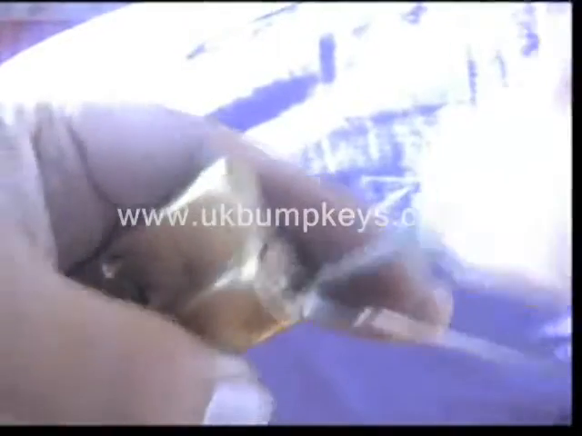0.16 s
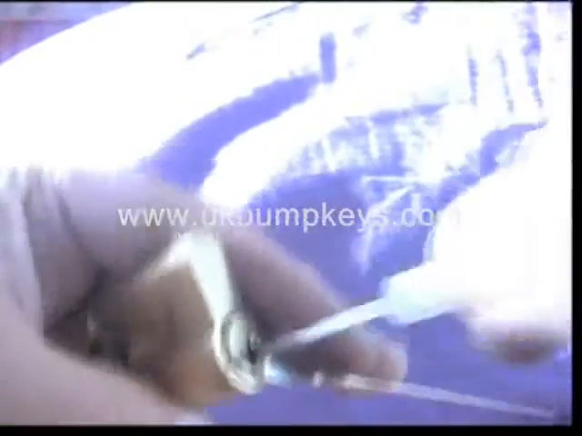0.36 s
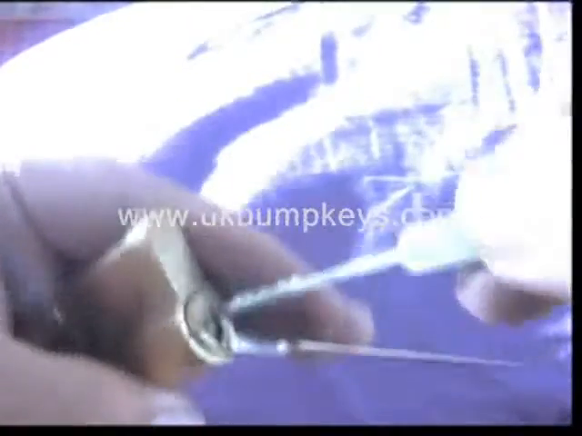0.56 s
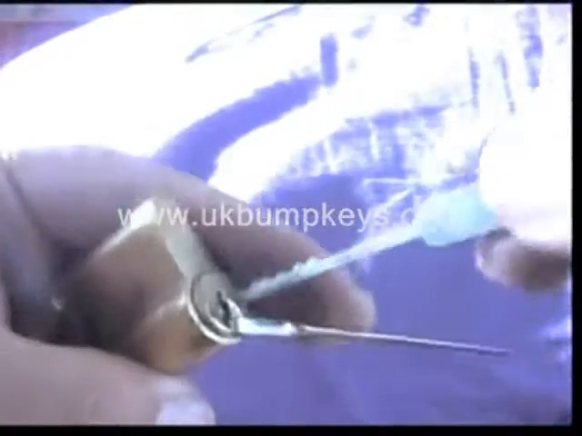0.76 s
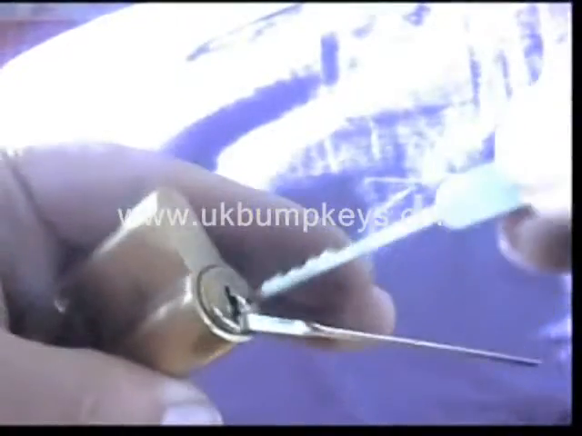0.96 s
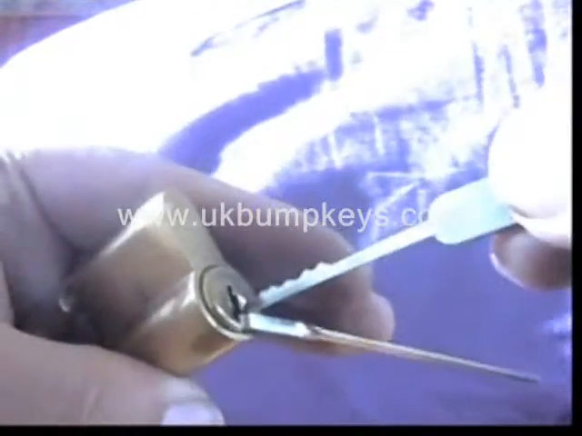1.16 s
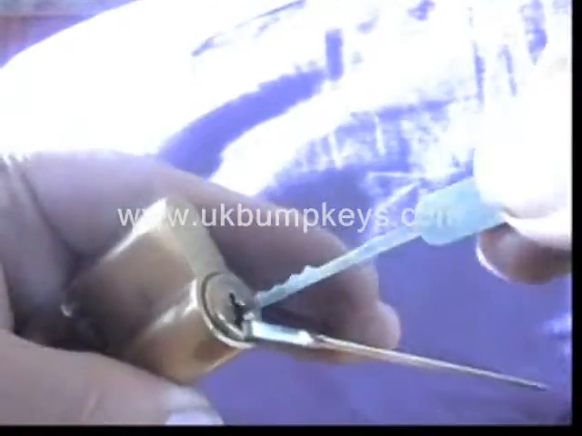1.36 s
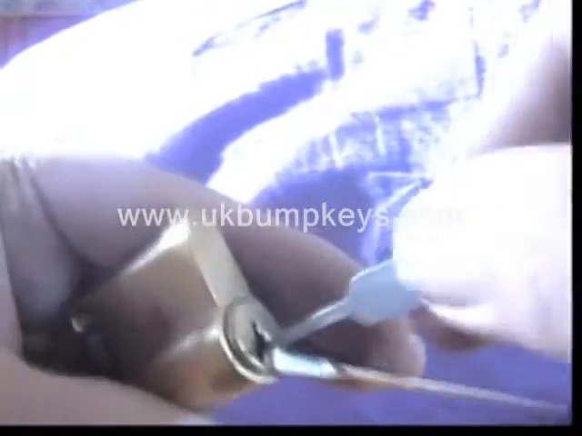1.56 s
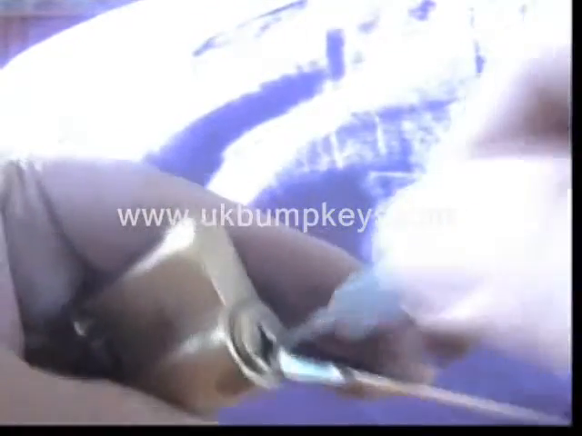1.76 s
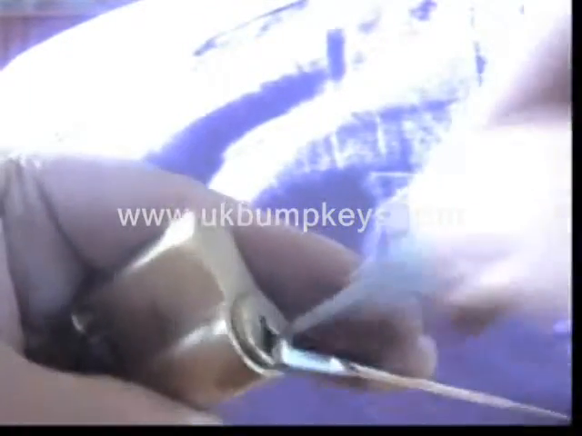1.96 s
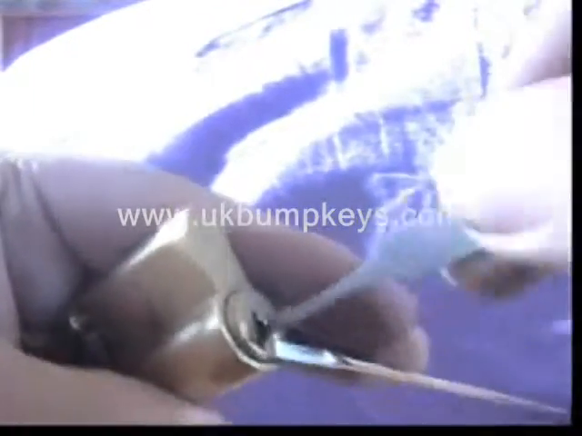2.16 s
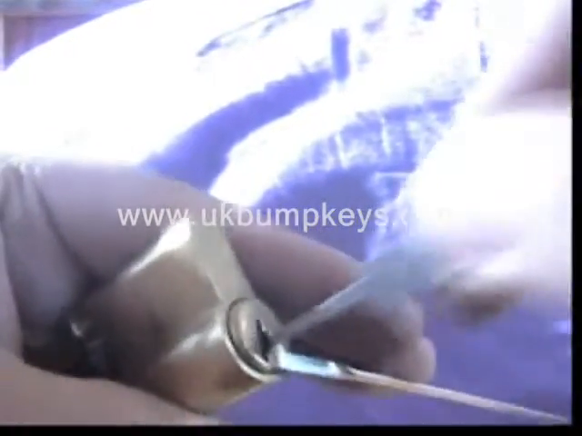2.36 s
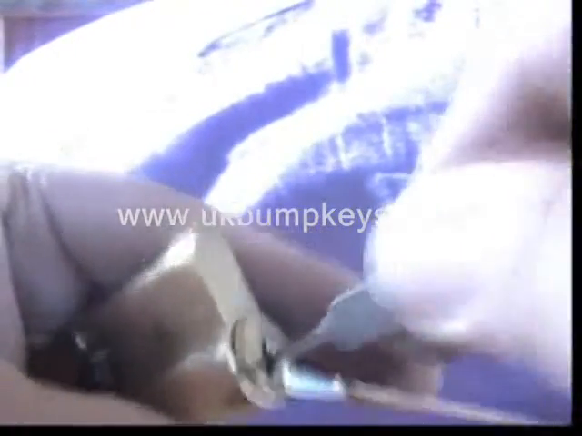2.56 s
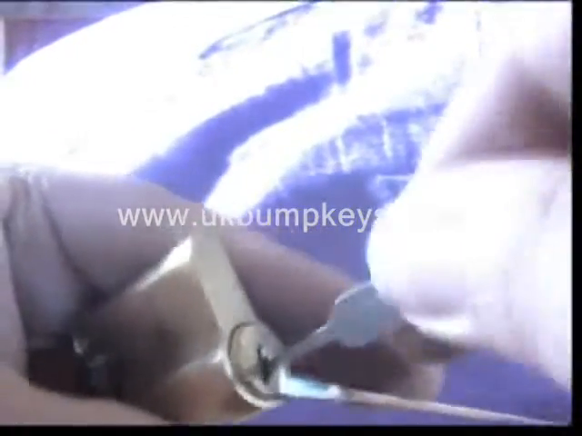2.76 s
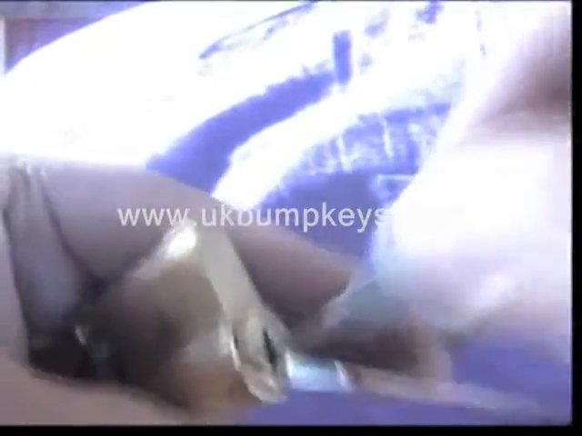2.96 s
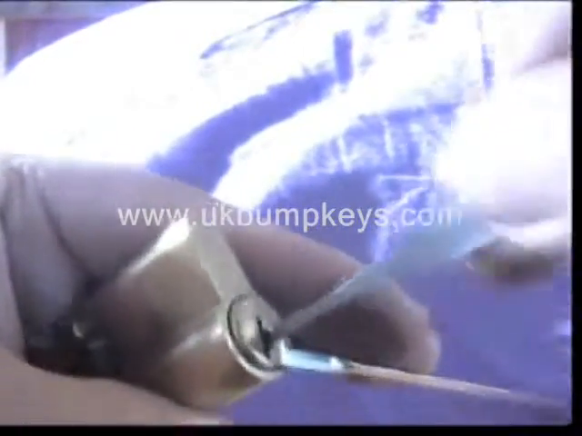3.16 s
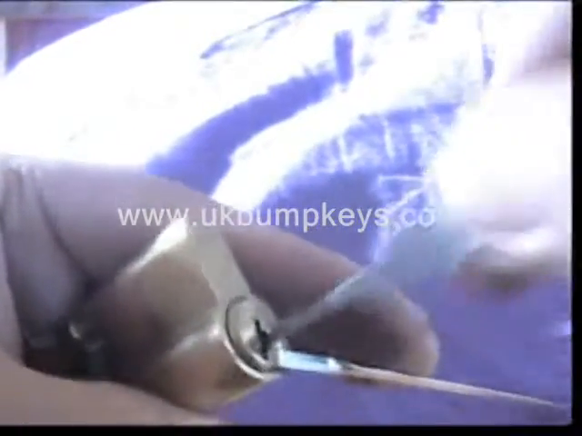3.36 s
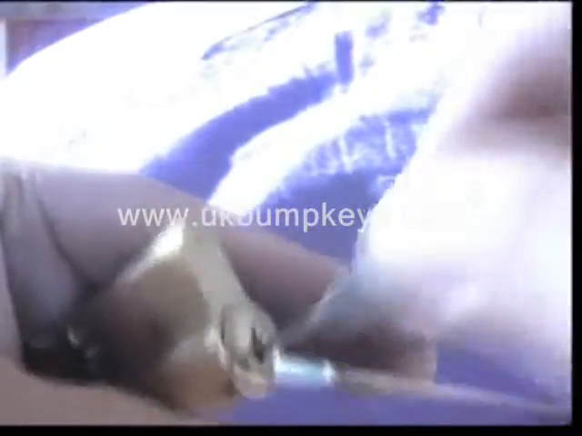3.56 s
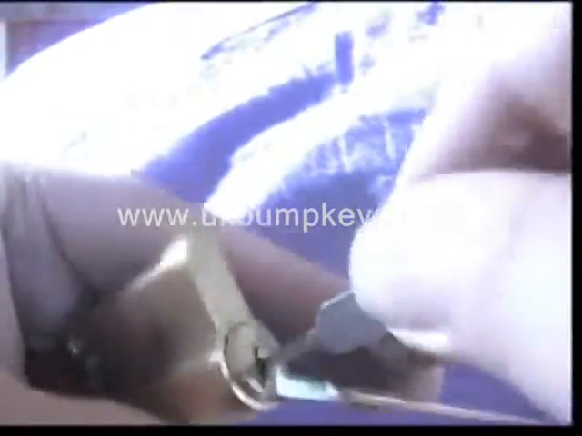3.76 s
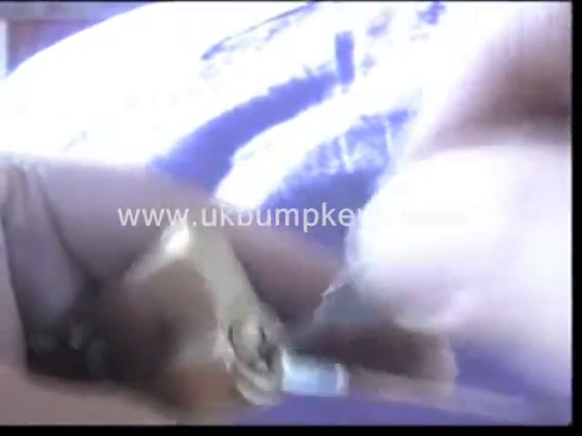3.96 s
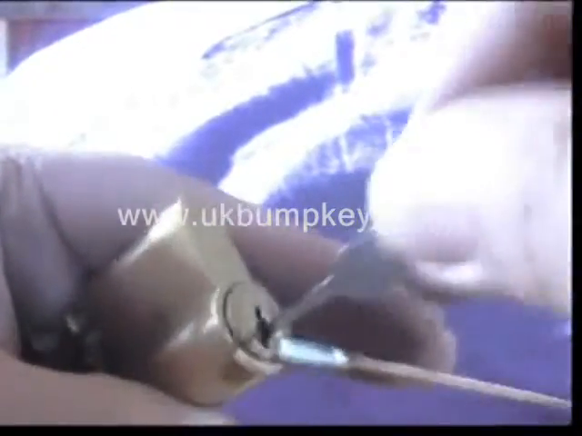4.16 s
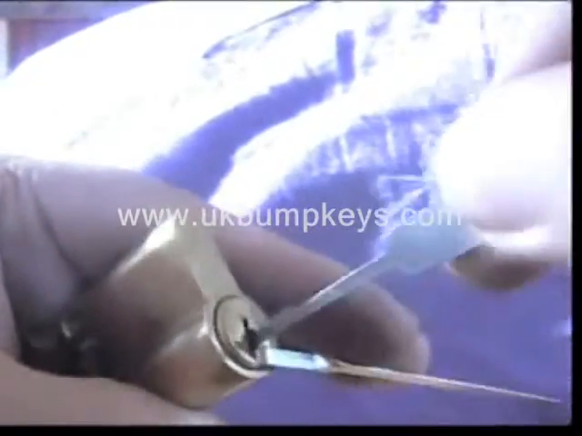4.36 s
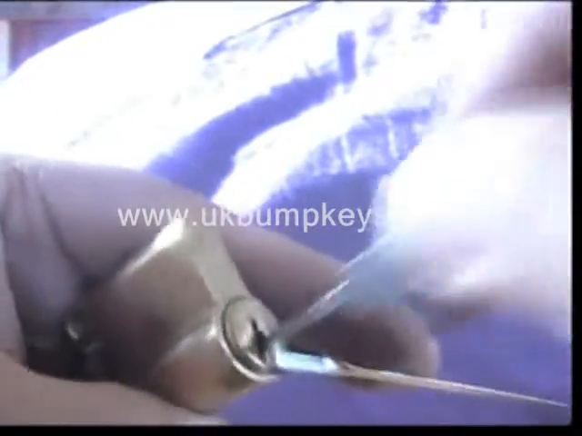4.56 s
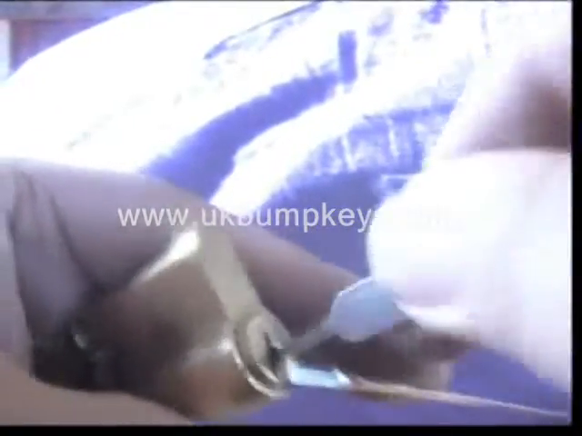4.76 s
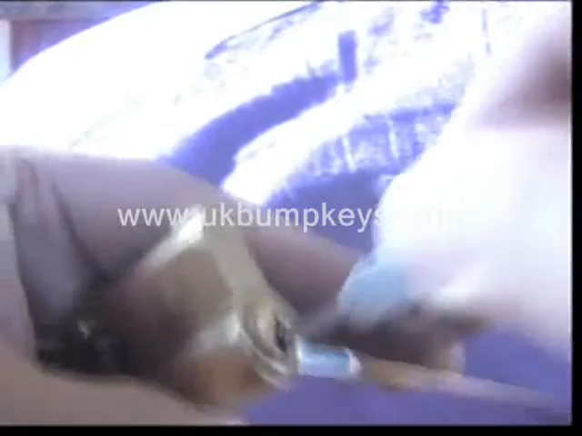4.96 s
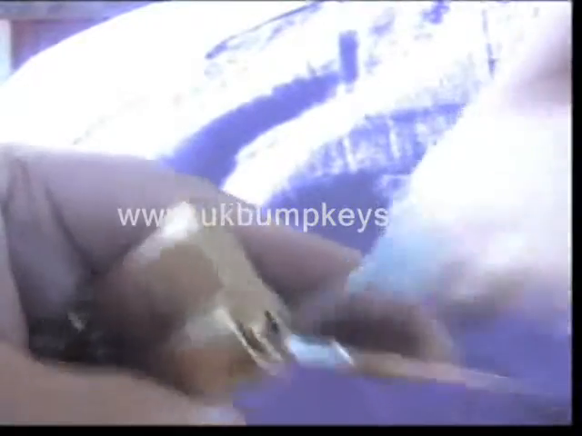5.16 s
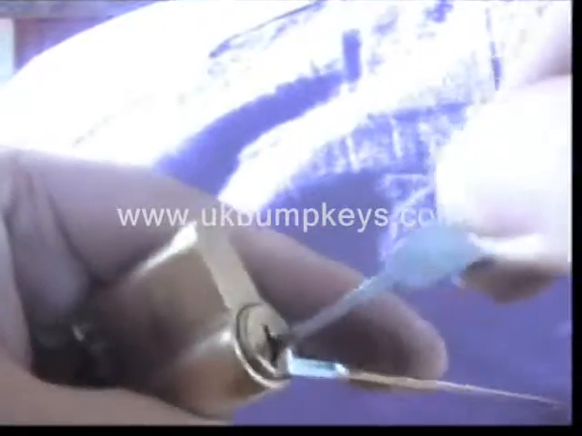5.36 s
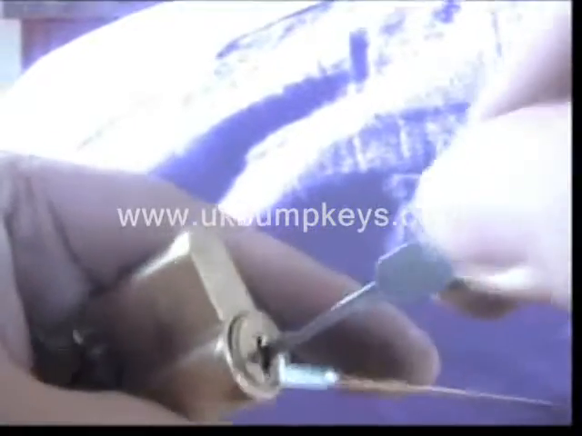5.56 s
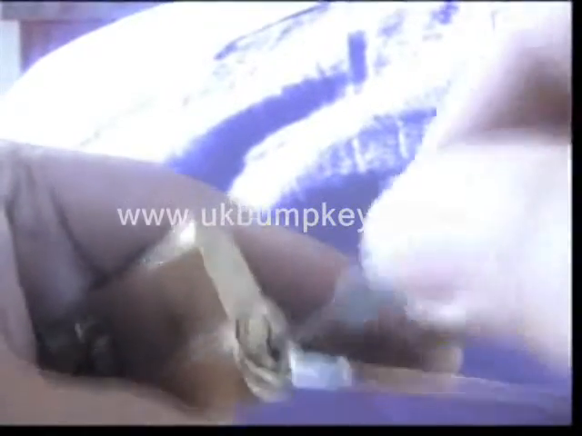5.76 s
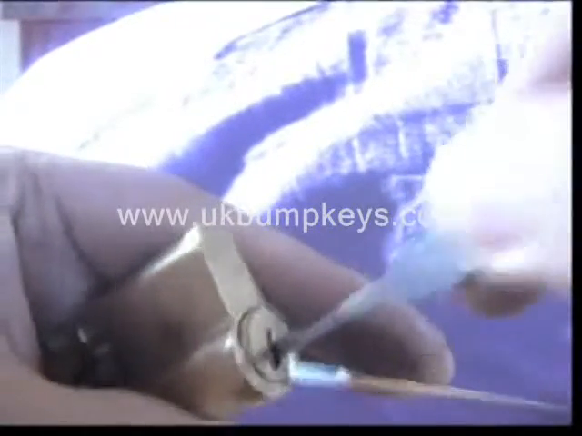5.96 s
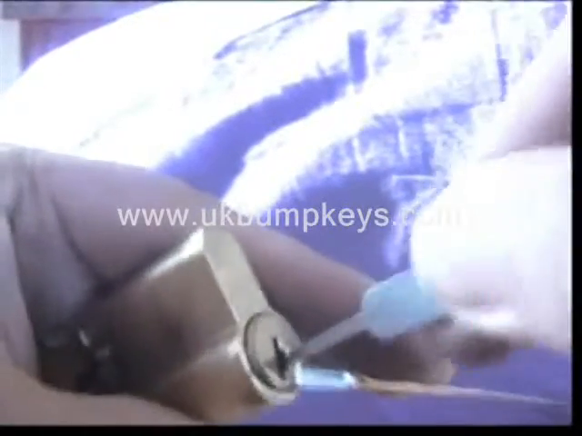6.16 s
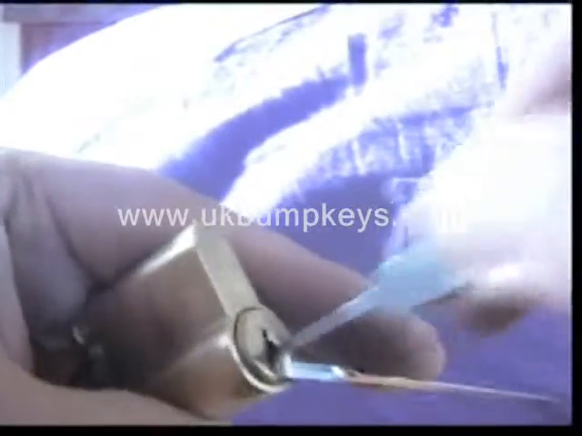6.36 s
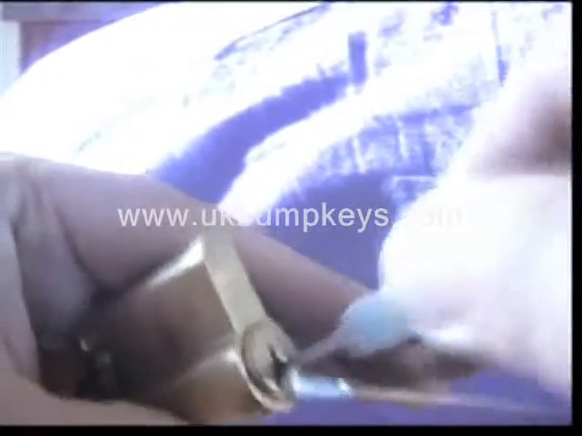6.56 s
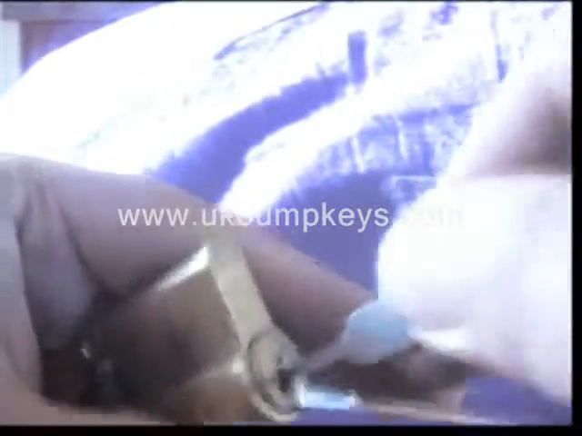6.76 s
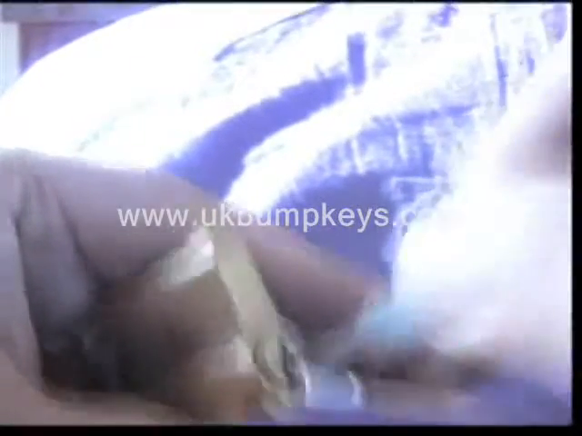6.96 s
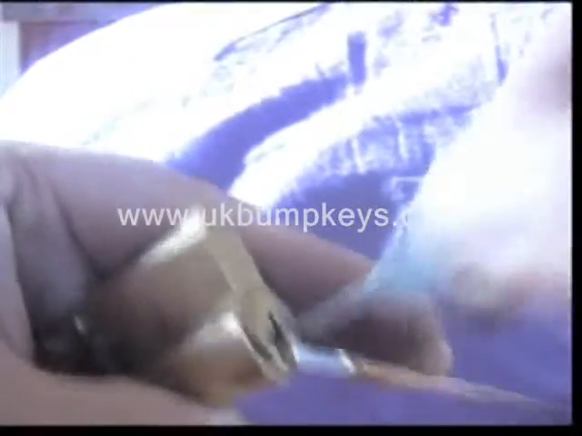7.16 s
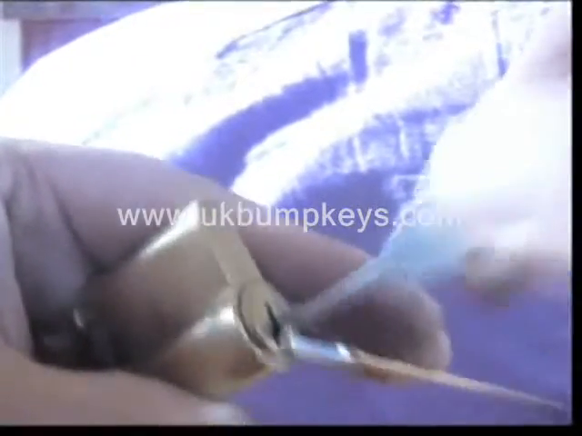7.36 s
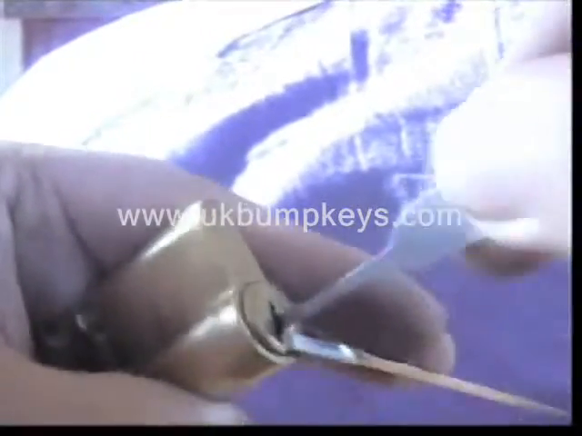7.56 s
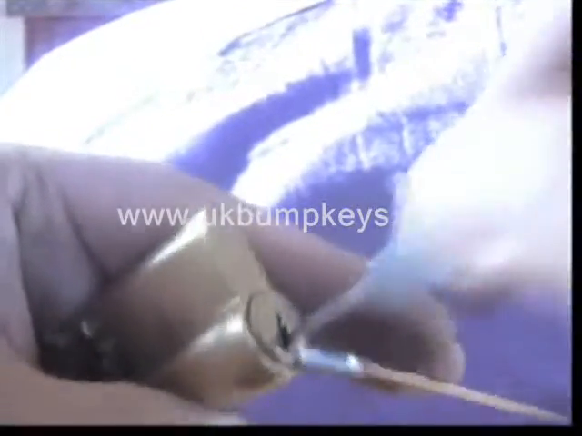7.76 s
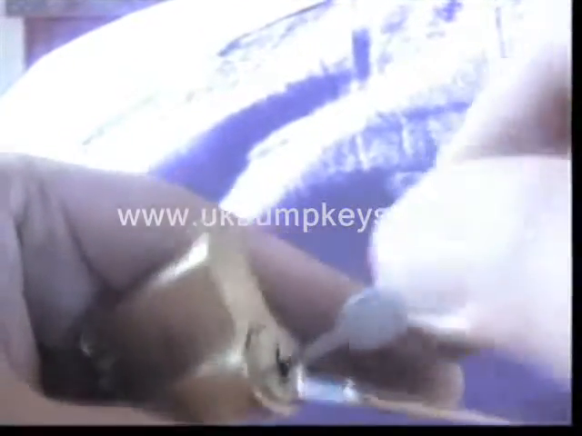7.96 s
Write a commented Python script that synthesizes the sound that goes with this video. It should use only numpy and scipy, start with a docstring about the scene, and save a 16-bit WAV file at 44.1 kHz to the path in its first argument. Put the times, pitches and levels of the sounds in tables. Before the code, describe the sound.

A small lock is raked in the hand: sparse clicks first, a quiet gap, then fast uneven strokes of gritty metallic chatter with sharp, tiny pin snaps and dull palm thuds. The strokes break off, restart lightly and grow strong again. Soft noise hiss and a thin steady whine lie underneath; the sound is close, with little bass and hardly any room.

```python
"""A steel rake scrubs in and out of a brass padlock held in the hand, close to a camera.
The rake's teeth chatter in tiny metallic ticks over a sliding hiss, while pins snap with short bright rings.
The lock knocks in the palm and the hand thuds along: ringing modes for the knocks, low noise for the thuds.
The camera adds a soft noise hiss that drifts a little and a thin whine of steady tones."""
import sys
import numpy as np
from scipy import signal
from scipy.fft import rfft, irfft, next_fast_len
from scipy.io import wavfile
from scipy.ndimage import map_coordinates

SR = 44100
rng = np.random.default_rng(int(sys.argv[2]) if len(sys.argv) > 2 else 0)


def file_out(sig):
    """Save sig as 16-bit WAV at sys.argv[1]."""
    # one column per channel
    cols = np.atleast_2d(sig).T
    # limit, then scale
    lim = np.clip(cols, -1, 1)
    pcm = np.round(lim * 32767).astype(np.int16)
    wavfile.write(sys.argv[1], SR, pcm)


N = 353593  # length of the scene [samples]

# Pulls and pushes of the rake: (time of fastest motion [s], rise [s], fall [s], scrape level [dB])
RAKE_STROKES = [(.415, 0.023, 0.05, -52), (.49, 0.029, 0.023, -48), (1.637, 0.057, 0.051, -48),
                (1.73, 0.033, 0.028, -45), (1.855, 0.053, 0.032, -36), (1.971, 0.046, 0.032, -41.5),
                (2.085, .03, 0.014, -31.5), (2.218, 0.056, 0.035, -41), (2.334, .041, 0.026, -33),
                (2.453, .057, 0.047, -39), (2.583, 0.046, 0.022, -33.5), (2.687, 0.038, 0.047, -39),
                (2.818, .04, 0.032, -35.5), (2.938, .047, 0.045, -38), (3.055, 0.036, 0.038, -33.5),
                (3.211, 0.08, 0.024, -37), (3.324, 0.049, 0.023, -32), (3.417, 0.027, .049, -35),
                (3.563, 0.053, 0.016, -30), (3.688, 0.049, 0.044, -37.5), (3.805, 0.039, .015, -29.5),
                (3.925, .053, 0.037, -38.5), (4.052, 0.047, 0.024, -30.5), (4.156, 0.033, .035, -46.5),
                (4.289, .021, 0.024, -42.5), (4.403, 0.038, 0.05, -35), (4.557, .06, .013, -31),
                (4.657, .024, 0.051, -32.5), (4.802, 0.044, 0.02, -28), (4.916, 0.041, 0.039, -32.5),
                (5.049, 0.063, 0.031, -32), (5.166, 0.05, 0.031, -34.5), (5.281, 0.046, .023, -28.5),
                (5.376, 0.045, .095, -47.5), (5.848, 0.028, 0.018, -28), (5.945, 0.039, .074, -42.5),
                (6.046, 0.0085, 0.0065, -43.5), (6.148, .021, 0.048, -49), (6.24, 0.024, 0.085, -54),
                (6.481, 0.073, .015, -46.5), (6.581, 0.058, 0.031, -38), (6.716, 0.061, 0.041, -43),
                (6.824, 0.045, 0.016, -37.5), (6.944, .079, .036, -42.5), (7.017, 0.019, .014, -40),
                (7.059, 0.0076, 0.0084, -33.5), (7.18, .068, .035, -41.5), (7.289, 0.054, 0.021, -34.5),
                (7.369, 0.012, .045, -35), (7.502, 0.044, 0.019, -31), (7.621, 0.045, 0.041, -41),
                (7.735, 0.036, 0.031, -31), (7.881, 0.056, 0.042, -37), (8.003, .036, 0.019, -26.5)]
# Ringing modes of lock and rake, seven lower and then six treble ones:
# (frequency [Hz], relative level [dB], time to fade by 60 dB [s])
LOCK_MODES = [(1658, 1, 0.0076), (2514, 0, 0.0072), (2946, -4.5, 0.013), (3470, 2, 0.0061),
              (4304, -4, 0.0094), (5060, -4, 0.0083), (6076, 3.5, 0.0061), (7350, -8, 0.01),
              (8060, -1.5, 0.0082), (9020, 5.5, 0.0046), (10510, -2, 0.011), (10310, 8.5, 0.0039),
              (11540, 2, 0.01)]


def amp(db):
    """Turn decibels into a plain gain."""
    return 10 ** (np.asarray(db) / 20)


def unit(x):
    """Scale a sound to an rms (average strength) of 1."""
    return x / np.sqrt(np.mean(x ** 2) + 1e-20)


def along(points, hz):
    """Read a curve of (frequency [Hz], value) points on a log frequency axis."""
    point_hz, value = np.transpose(points)
    return np.interp(np.log(hz + 1), np.log(point_hz + 1), value)


def filtered(x, response):
    """Shape the spectrum of x by a gain that depends on frequency."""
    padded = next_fast_len(N + 8192)
    spectrum = rfft(x, padded) * response(np.fft.rfftfreq(padded, 1 / SR))
    return irfft(spectrum, padded)[..., :N]


def noise(spectrum, alike):
    """Stereo noise of rms 1; shared and opposite parts set how alike left and right are."""
    def mid_side_gain(hz):
        angle = np.arccos(np.clip(along(alike, hz), -1, 1)) / 2
        return amp(along(spectrum, hz)) * [np.cos(angle), np.sin(angle)]

    mid, side = filtered(rng.standard_normal((2, N)), mid_side_gain)
    return unit(np.array([mid + side, mid - side]))


def strikes(s, modes, db, scatter_db, size, favour_db=0):
    """Each strike shares its energy among fading modes, with its own random strengths and phases."""
    hz, level, t60 = np.transpose(modes)[:, :, None]
    t = np.arange(size) / SR
    chance = rng.standard_normal((len(s), len(modes), 4))
    share = amp(level + favour_db + scatter_db * chance[..., :2])
    share = share / np.sqrt(np.sum(share ** 2, axis=(1, 2), keepdims=True))
    weight = amp(db)[:, None, None] * share * np.exp(2j * chance[..., 2:])
    rise = (1 - np.exp(-t / .0003)) ** 2
    fade = amp(-60 * t / t60) * rise
    # Every mode is a close pair, 3 % below and above its listed frequency
    low = weight[..., 0] @ (fade * np.exp(2j * np.pi * hz * .97 * t))
    high = weight[..., 1] @ (fade * np.exp(2j * np.pi * hz * 1.03 * t))
    start = np.round(np.maximum(s - .0003, 0) * SR).astype(int)
    at = start[:, None] + np.arange(size)
    # Add up all strikes, overlaps included
    return np.bincount(at.ravel(), np.imag(low + high).ravel(), N + size)[:N]


def stroke_level(rows, edge_db, fall_db):
    """Gain that swells to each row's peak, is edge_db lower at its ends, then also drops fall_db a second."""
    t, gain = np.arange(N) / SR, np.zeros(N)
    for fastest, rise, fall, db in rows:
        first = max(round((fastest - rise - .1) * SR), 0)
        near = slice(first, round((fastest + fall + .1) * SR))
        place = np.interp(t[near] - fastest, [-rise, 0, fall], [-1, 0, 1])
        before, after = fastest - rise - t[near], t[near] - fastest - fall
        outside = np.maximum(np.maximum(before, after), 0)
        gain[near] += amp(db - edge_db * place ** 2 - fall_db * outside)
    return gain


def scrape_level():
    """Gain of the scrape, swelling with every pull or push of the rake."""
    return stroke_level(RAKE_STROKES, edge_db=11.0, fall_db=698)


def rake(ticks):
    """Teeth tick unevenly and steel hisses over brass; each tick has three chances (moment, size, place)."""
    # Steel sliding on brass: (frequency [Hz], relative level [dB])
    sliding_spectrum = [(530, -49), (900, 0), (1560, -4), (2040, -5), (2490, 3), (3000, 7), (3910, -1),
                        (4270, -15), (5440, -3), (5880, -10), (6860, 0), (8370, -17), (11200, 2),
                        (11900, -16.5), (12600, -37), (16400, -67), (22000, -120)]
    moment, size, place = ticks.T
    db = -3.3 * np.log(size + 1 / 100)  # many faint ticks, few strong ones
    # Each tick favours the modes near its own place in the list
    apart = np.arange(len(LOCK_MODES))[:, None] / len(LOCK_MODES) - place[:, None, None]
    chatter = unit(strikes(moment * N / SR, LOCK_MODES, db, scatter_db=6, size=500,
                           favour_db=-30 * np.abs(apart)))
    slide = noise(sliding_spectrum, [(1000, 0.9)])[0]
    return scrape_level() * (amp(-3.5) * chatter + amp(-8.5) * slide)


def pins(snaps):
    """Pins snap off the teeth: lock and rake ring briefly, and the lock's body knocks in the palm."""
    # Lock body in the palm: (frequency [Hz], relative level [dB], time to fade by 60 dB [s])
    palm_modes = [(286, 6, 0.014), (420.5, -10.5, 0.033), (725, -4, 0.018), (1048, 3, 0.012),
                  (1453, -1.5, 0.019), (1890, -13.5, 0.054)]
    # Extra palm knocks, most of them together with a pin snap: (time [s], relative level [dB])
    extra_knocks = [(0.2036, -23), (0.4853, -34), (0.5534, -41.5), (0.7057, -44.5), (1.095, -48),
                    (1.32, -43), (2.32, -35), (4.0935, -30), (5.5879, -31.5), (6.0447, -43)]
    firm_snap_db, firm_knock_db = -20, -39.5  # a firm snap and the relative level of the knock under it
    knock_growth = 0.51  # dB of knock gained per dB of snap above firm

    s, ring_db, ring_hz, treble_db = snaps.T
    low_modes, treble_modes = LOCK_MODES[:7], LOCK_MODES[7:]
    # Where a pin strikes decides which modes it favours
    octaves = np.log2(np.array(low_modes)[:, :1] / ring_hz[:, None, None])
    # Dull snaps ring few modes, bright ones ring more of them [dB per octave]
    narrow_db = np.clip(9.5 + 0.36 * (ring_db - treble_db), 4, 24)
    ring = strikes(s, low_modes, ring_db + 5.0, scatter_db=2.5, size=800,
                   favour_db=-narrow_db[:, None, None] * np.abs(octaves))
    treble = strikes(s, treble_modes, treble_db + 4.5, scatter_db=0, size=400)

    knock_s, knock_db = np.transpose(extra_knocks)
    over_db = np.maximum(ring_db, treble_db) - firm_snap_db
    under_db = firm_knock_db + np.minimum(over_db, knock_growth * over_db)
    knock = strikes(np.r_[knock_s, s], palm_modes, np.r_[knock_db, under_db], scatter_db=8.0, size=2500)
    return ring + treble + amp(7.0) * knock


def small_snaps():
    """Lesser pin snaps at random moments, about as strong as the stroke under them."""
    snaps_per_s = 40
    over_scrape_db, spread_db = -4, 5.5  # typical level against the scrape gain, and its scatter
    typical_hz, spread_octaves = 3140, 0.16  # strongest ring and its scatter
    count = snaps_per_s * N // SR
    s = rng.random(count) * (N - 1) / SR
    chance = rng.standard_normal((count, 3))
    scrape = scrape_level()[(s * SR).astype(int)]
    db = 20 * np.log10(scrape + 1e-6) + over_scrape_db
    ring_db = db + spread_db * chance[:, 0]
    ring_hz = typical_hz * 2 ** (spread_octaves * chance[:, 1])
    treble_db = db + spread_db * chance[:, 2]
    return np.c_[s, ring_db, ring_hz, treble_db]


def hand():
    """The hand's effort thuds as lumpy low noise, whose lowest part differs most from left to right."""
    # Color of the thuds: (frequency [Hz], relative level [dB])
    thud_spectrum = [(15, -57), (25, -17), (70, -0.5), (162, -1), (257, 0), (716, 1), (1200, -4.5),
                     (1580, -8), (2000, -13), (2600, -46), (4400, -120)]
    # The hand shifts its grip: (time of strongest thud [s], rise [s], fall [s], thud level [dB])
    grip_shifts = [(.213, 0.0074, 0.023, -36), (.49, 0.022, .032, -50.5), (.86, .04, 0.095, -64),
                   (1.09, 0.1, .03, -58.5), (4.1, .012, 0.02, -42)]
    firm_scrape_db, firm_thud_db = -35, -47.5  # a firm stroke's scrape and the thud under it
    thud_growth = 0.72  # dB of thud gained per dB of scrape

    lump_chance = rng.standard_normal(N // 400 + 4)
    lumps = amp(2.9 * map_coordinates(lump_chance, [np.arange(N) / 400]))  # about 110 random points a second
    stroke_thuds = [(s, rise, fall, firm_thud_db + thud_growth * (db - firm_scrape_db))
                    for s, rise, fall, db in RAKE_STROKES]
    level = stroke_level(stroke_thuds + grip_shifts, edge_db=16.5, fall_db=440)
    return level * unit(lumps * noise(thud_spectrum, [(100, 0.1), (1000, 1.0)]))


def room(x, t60):
    """Scatter x into a short random tail that fades by 60 dB in t60 seconds."""
    t = np.arange(SR // 8) / SR
    tail = rng.standard_normal(len(t)) * amp(-60 * t / t60)
    return signal.fftconvolve(x, tail / np.linalg.norm(tail))[:N]


def camera():
    """The camera makes noise hiss that drifts a little, and a thin whine of steady sine tones."""
    # Color of the hiss: (frequency [Hz], relative level [dB])
    hiss_spectrum = [(35, -40), (105, -11), (140, 1), (300, 2), (870, -4.5), (1400, -9), (1950, -12.5),
                     (2450, -11.5), (2900, -13.5), (5200, -19.5), (6600, -20), (7400, -11.5), (8600, -20.5),
                     (12400, -19)]
    # Loudness of the hiss before its small drift: (time [s], level [dB])
    hiss_level = [(0, -49), (.3, -48.5), (.36, -54.5), (1.5, -56), (2, -53), (5.4, -53), (5.7, -54),
                  (6.4, -56), (8, -52.5)]
    # How alike left and right hiss are: (frequency [Hz], likeness [0 to 1])
    hiss_likeness = [(60, 0.0094), (1300, 0), (2700, 0.16), (4500, 1), (12500, 1)]
    # Steady tones of the whine: (frequency [Hz], rms level [dB])
    whine_tones = [(150, -74), (300, -75), (450, -77), (2100, -84), (2400, -76), (3600, -86), (4200, -82),
                   (4500, -80), (4800, -83), (5100, -78), (5400, -76), (5700, -79), (6000, -80),
                   (6300, -81), (6600, -82), (6900, -83), (7025, -81), (7332, -80), (7537, -79),
                   (7839, -81), (8100, -80)]

    t = np.arange(N) / SR
    whine = np.zeros(N)
    for hz, db in whine_tones:
        phase = rng.uniform(0, 2 * np.pi)
        whine += amp(db + 3) * np.sin(2 * np.pi * hz * t + phase)  # a sine peaks 3 dB above its rms
    drift_db = 0.33 * map_coordinates(rng.standard_normal(N // 4000 + 4), [np.arange(N) / 4000])
    level_db = np.interp(t, *np.transpose(hiss_level)) + drift_db
    return amp(level_db) * noise(hiss_spectrum, hiss_likeness) + whine


def scene():
    """Mix the lock, with a little room, with hand and camera."""
    # The louder pin snaps: (time [s], relative ring level [dB], strongest ring [Hz], relative treble level [dB])
    loud_snaps = [(.1384, -41, 3440, -31), (0.205, -17.5, 2740, -23), (.318, -35, 2850, -35),
                  (.408, -37, 3550, -29), (0.417, -34, 4140, -45), (.4295, -46, 4480, -29),
                  (.442, -48, 2120, -29), (0.447, -55, 3940, -31), (.4593, -40, 3810, -27),
                  (0.4858, -31, 3930, -29.5), (0.5536, -24.5, 2600, -33.5), (0.7058, -30.5, 3170, -27.5),
                  (1.3212, -40, 1690, -59), (1.505, -58, 3120, -42), (1.5779, -35.5, 3200, -30),
                  (1.6324, -31.5, 5600, -29), (1.6456, -44, 3100, -33), (1.736, -35, 4210, -33),
                  (1.804, -38, 3590, -29), (1.8482, -21, 4220, -15.5), (1.8598, -30, 3170, -18),
                  (1.8663, -23.5, 3140, -12.5), (1.9622, -46, 2530, -24.5), (1.971, -17, 3500, -54),
                  (1.998, -26, 3550, -30), (2.0517, -24, 3890, -14.5), (2.069, -33, 3000, -17),
                  (2.0805, -45, 3180, -15), (2.0875, -11.5, 3400, -8), (2.102, -21.5, 2550, -42),
                  (2.183, -23, 2960, -25), (2.215, -27, 3200, -26), (2.245, -28, 2000, -25),
                  (2.2887, -20, 4660, -14.5), (2.3296, -15.5, 3780, -34), (2.3375, -13.5, 3400, -10.5),
                  (2.427, -26, 3120, -36), (2.4513, -25, 3210, -14), (2.4632, -27.5, 3310, -42),
                  (2.5463, -29, 3210, -26), (2.5657, -37, 2660, -26), (2.5761, -32, 2670, -29),
                  (2.5896, -16.5, 2830, -12.5), (2.6602, -28.5, 5950, -37), (2.8148, -33, 2410, -22),
                  (2.8338, -32, 3420, -26), (2.8997, -27, 2920, -33), (2.9284, -26, 2550, -15.5),
                  (2.9562, -23, 2770, -29), (3.0422, -36, 2940, -20.5), (3.058, -26, 2960, -20),
                  (3.0829, -18.5, 3620, -10.5), (3.1187, -31, 3090, -27), (3.153, -21.5, 3760, -15.5),
                  (3.174, -27, 3280, -32), (3.2098, -29, 3550, -25), (3.316, -28, 2880, -20),
                  (3.3237, -33, 2680, -16), (3.3336, -16, 3600, -6), (3.4203, -25, 5520, -17),
                  (3.559, -15.5, 3360, -16), (3.5683, -12.5, 4000, -8), (3.583, -17.5, 2820, -16.5),
                  (3.722, -21.5, 3300, -32), (3.7666, -34, 3490, -19), (3.804, -13.5, 4600, -4.5),
                  (3.8188, -15.5, 2500, -28), (3.912, -43, 2740, -25), (3.9625, -26, 3800, -19),
                  (3.9964, -34, 5120, -31), (4.0394, -36, 4190, -13), (4.0579, -18.5, 3970, -11),
                  (4.073, -37, 3000, -42), (4.0933, -28, 3070, -39), (4.1127, -36, 3210, -48),
                  (4.163, -34, 1590, -48), (4.283, -18, 3530, -20), (4.3016, -31, 2980, -18),
                  (4.3546, -36, 4770, -25), (4.4067, -36, 5450, -16.5), (4.4353, -18, 6100, -23),
                  (4.4896, -20, 6110, -16.5), (4.5309, -20, 3040, -24), (4.545, -30, 3260, -24),
                  (4.5652, -16, 3020, -7.5), (4.6184, -39, 2800, -27.5), (4.6578, -40, 5220, -17),
                  (4.6682, -30, 3800, -20), (4.6889, -24.5, 2830, -43), (4.699, -24, 5390, -18),
                  (4.8066, -12, 3130, -4), (4.8278, -21, 2200, -38), (4.9, -41, 3200, -20),
                  (4.9119, -24, 2940, -30), (4.9288, -34, 3690, -16), (4.9918, -33, 2620, -23),
                  (5.0259, -38, 5450, -17.5), (5.0488, -33, 3290, -15), (5.0556, -14.5, 2940, -4.5),
                  (5.11, -27, 3270, -51), (5.1187, -26, 5960, -22.5), (5.1508, -32, 3290, -20),
                  (5.194, -24, 4860, -20), (5.28, -9, 4200, -4.5), (5.2879, -14.5, 2640, -18),
                  (5.3759, -25, 3020, -25), (5.413, -22, 2970, -19.5), (5.439, -25.5, 3370, -24.5),
                  (5.5897, -25.5, 2760, -29.5), (5.6755, -35.5, 1870, -39), (5.7371, -35.5, 1590, -29.5),
                  (5.8142, -29, 3500, -27), (5.8279, -24, 3570, -20), (5.8376, -21, 2870, -19),
                  (5.8512, -11.5, 4600, -6), (5.943, -32, 2510, -28), (5.9762, -25, 5660, -21),
                  (5.9984, -28.5, 4290, -20.5), (6.0447, -25, 2560, -25), (6.1374, -37, 3260, -49),
                  (6.148, -32, 3740, -23), (6.178, -31.5, 2860, -42), (6.2291, -36, 2780, -41),
                  (6.406, -33, 1740, -40), (6.425, -26.5, 3000, -35), (6.4399, -33, 5040, -28.5),
                  (6.4548, -36, 2940, -24), (6.4753, -29, 2900, -35), (6.534, -39, 3560, -22),
                  (6.585, -13, 4000, -9.5), (6.6855, -29, 2950, -63), (6.7127, -29, 3490, -32.5),
                  (6.7797, -30, 2870, -23), (6.826, -12, 3780, -7), (6.9396, -29, 3320, -30),
                  (6.9608, -23.5, 3750, -23), (7.014, -32, 4850, -30), (7.025, -29, 3380, -40),
                  (7.0558, -13, 3920, -5), (7.129, -26, 3200, -52), (7.168, -29, 3060, -32),
                  (7.1948, -27.5, 3980, -29), (7.241, -27, 2800, -43), (7.2949, -13, 3430, -10),
                  (7.3625, -24, 3750, -16), (7.375, -28, 3140, -41), (7.4104, -31, 3110, -26),
                  (7.466, -25, 3490, -20), (7.501, -11, 4080, -10.5), (7.5088, -13.5, 2520, -23),
                  (7.6127, -31, 2460, -26), (7.6172, -24.5, 2740, -14.5), (7.7413, -12, 3940, -3.5),
                  (7.762, -10.5, 2740, -6.5), (7.8433, -27, 4880, -15), (7.8583, -20.5, 2690, -39),
                  (7.9028, -23, 3030, -21), (7.9482, -22, 3610, -48), (7.9805, -24, 2980, -31),
                  (7.9907, -40, 4210, -12), (8.0038, -10, 3100, -6.5)]
    # Gain of the left-right difference of the lock: (frequency [Hz], gain [dB])
    lock_width = [(100, -5), (500, -6), (1200, -7), (2500, -11), (4000, -24), (5000, -40), (9500, -40),
                  (11500, -24)]
    ticks = rng.random((600 * N // SR, 3))  # 600 ticks a second
    snaps = np.r_[loud_snaps, small_snaps()]
    lock = pins(snaps) + rake(ticks)
    lock = lock + amp(-22) * room(lock, t60=0.06)
    # The same contacts with other random mode strengths, added left and subtracted right
    other_lock = pins(snaps) + rake(ticks)
    side = filtered(other_lock, lambda hz: amp(along(lock_width, hz)))
    return lock + np.array([side, -side]) + hand() + camera()


def record(dry):
    """The microphone thins the bass; the camera rolls off steeply at its band limit."""
    bass_hz, top_hz = 150, 12300

    def response(hz):
        bass = hz / np.sqrt(hz ** 2 + bass_hz ** 2)
        rolloff_db = -np.clip(hz - top_hz + 500, 0, None) / 25  # 1 dB down every 25 Hz
        return bass * amp(rolloff_db) * (hz < top_hz + 750)

    return filtered(dry, response)


dry = scene()
out = record(dry)
file_out(out)
```